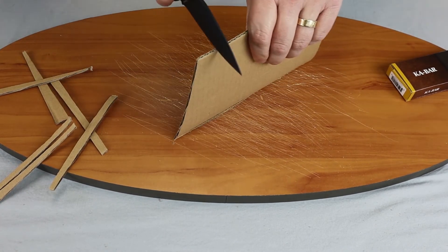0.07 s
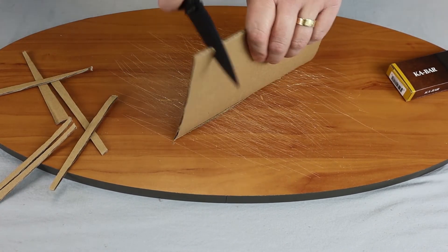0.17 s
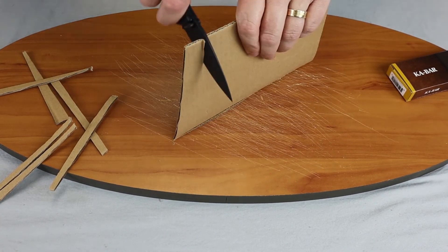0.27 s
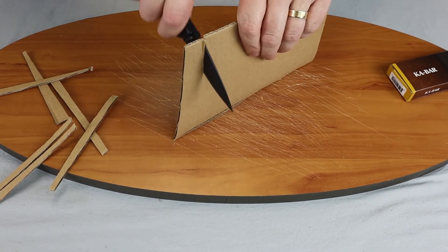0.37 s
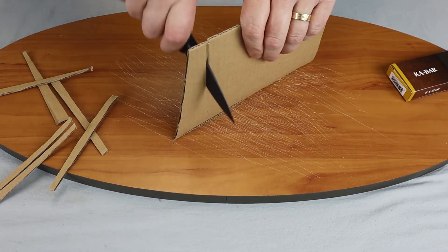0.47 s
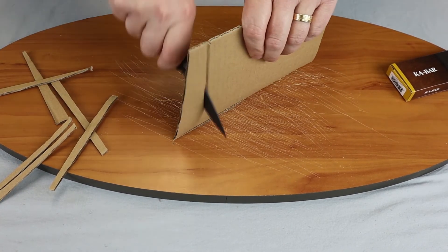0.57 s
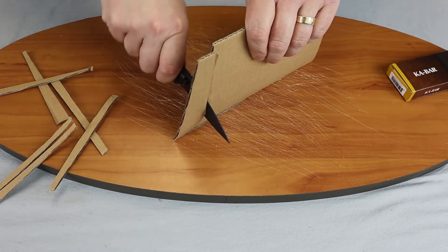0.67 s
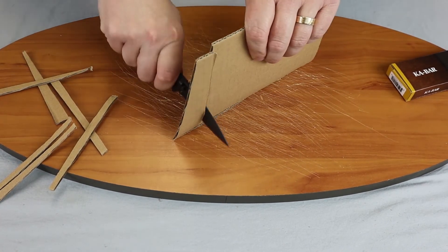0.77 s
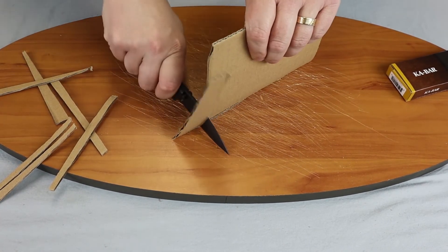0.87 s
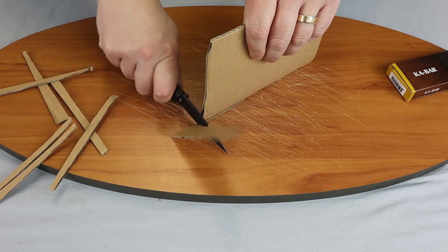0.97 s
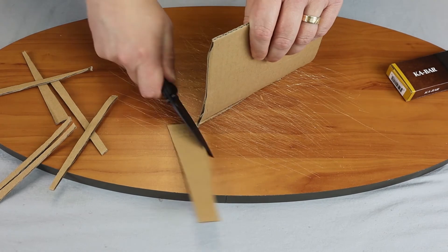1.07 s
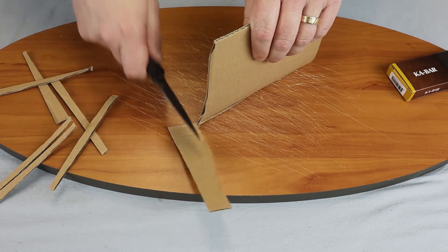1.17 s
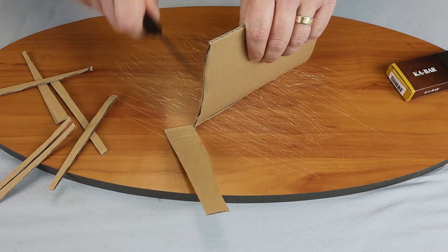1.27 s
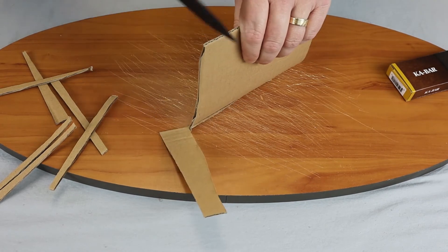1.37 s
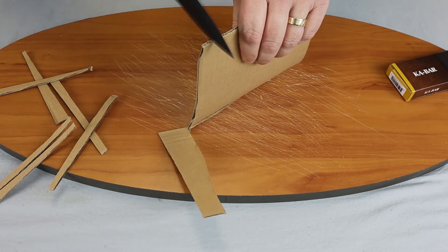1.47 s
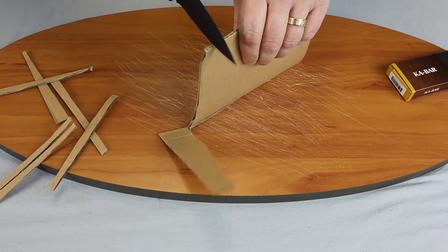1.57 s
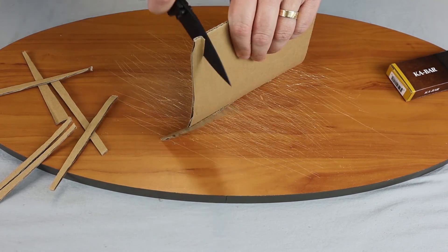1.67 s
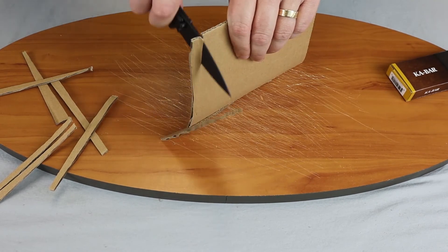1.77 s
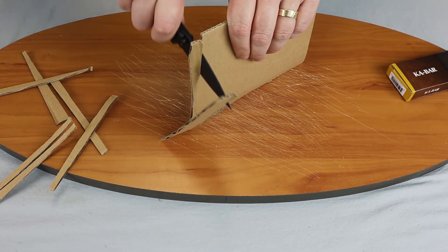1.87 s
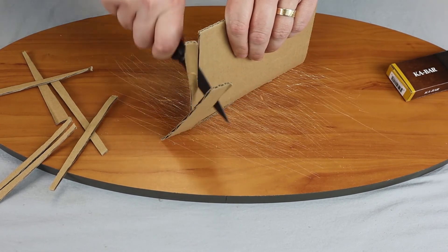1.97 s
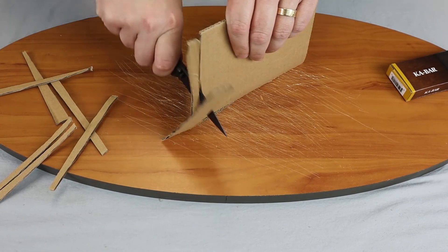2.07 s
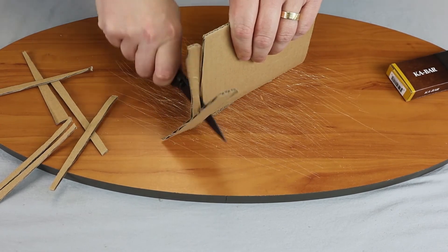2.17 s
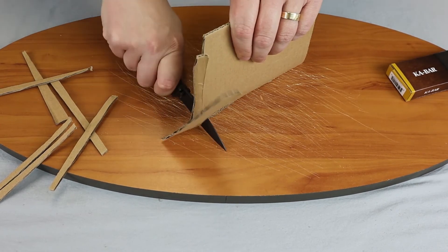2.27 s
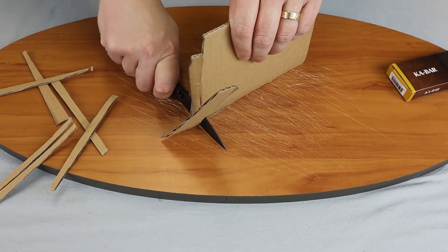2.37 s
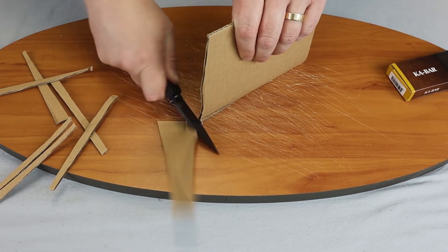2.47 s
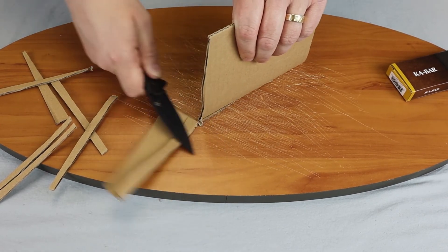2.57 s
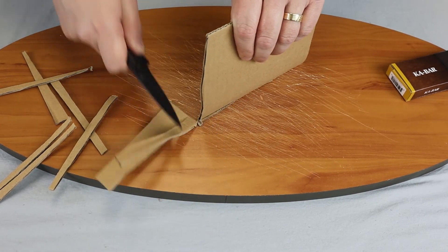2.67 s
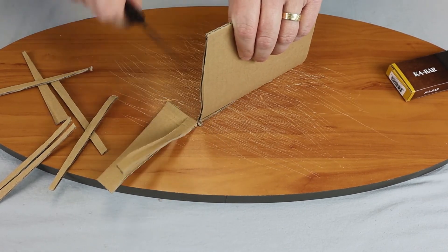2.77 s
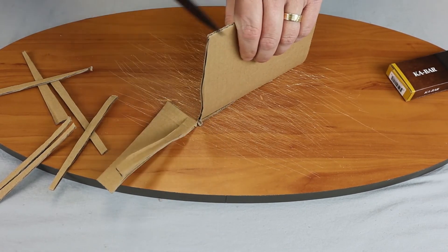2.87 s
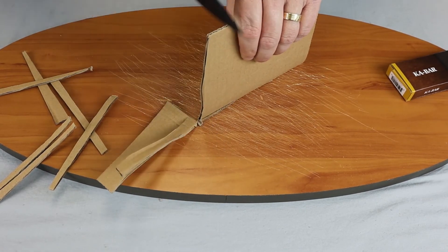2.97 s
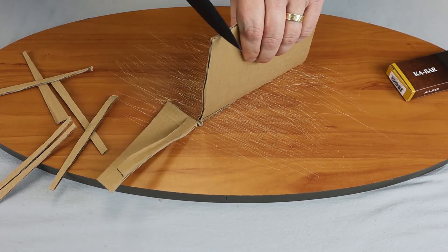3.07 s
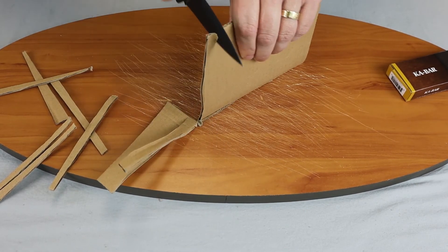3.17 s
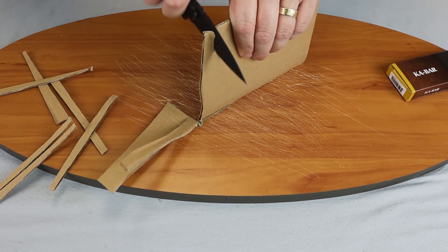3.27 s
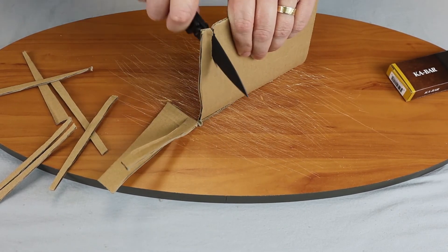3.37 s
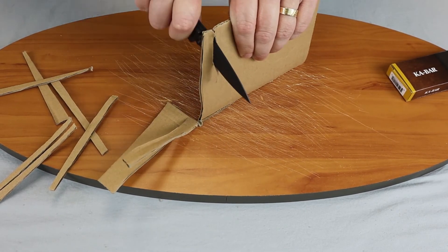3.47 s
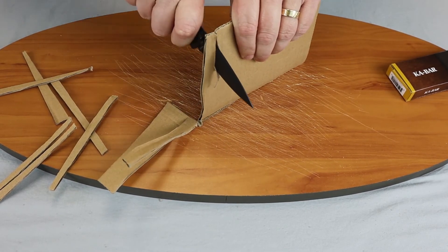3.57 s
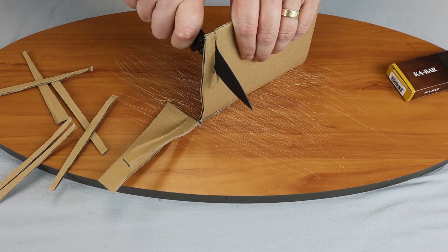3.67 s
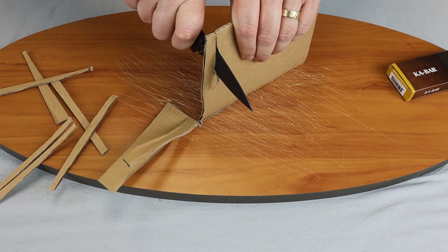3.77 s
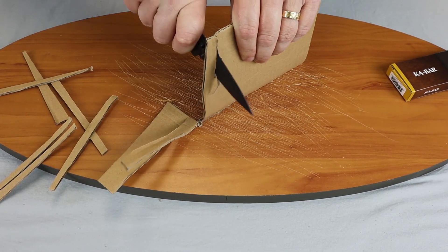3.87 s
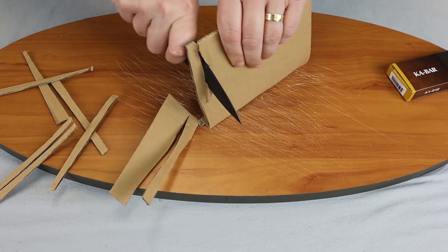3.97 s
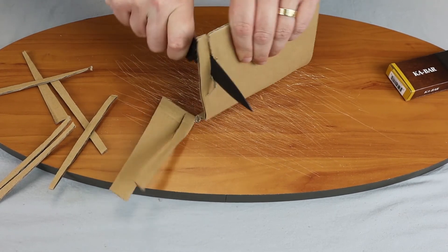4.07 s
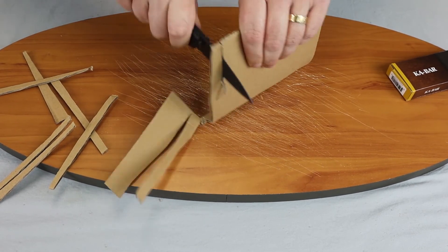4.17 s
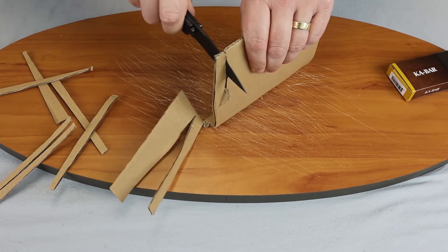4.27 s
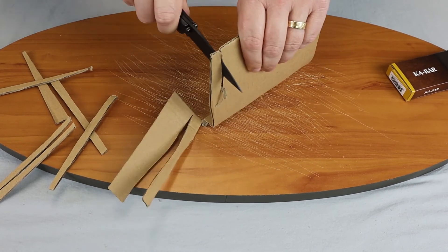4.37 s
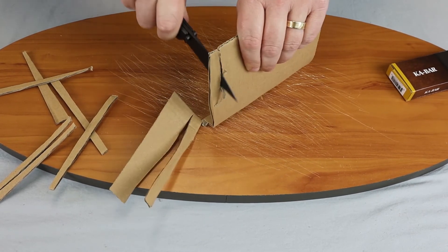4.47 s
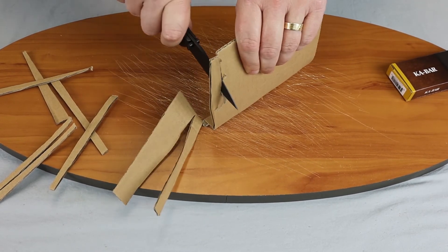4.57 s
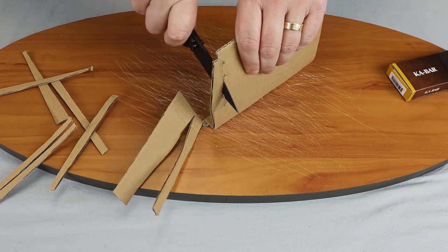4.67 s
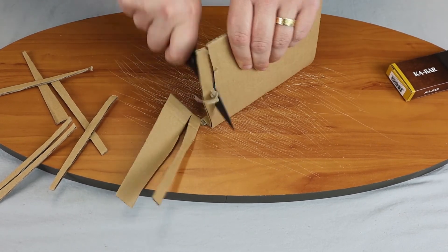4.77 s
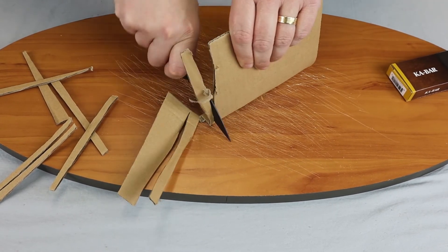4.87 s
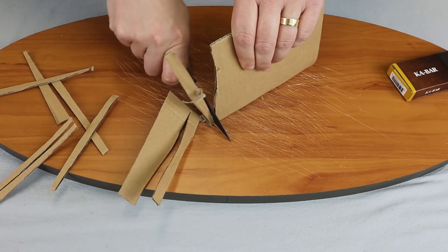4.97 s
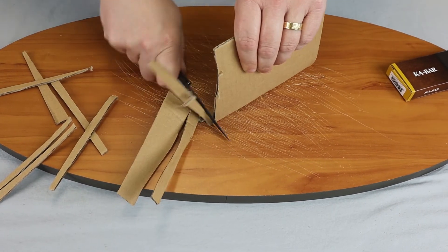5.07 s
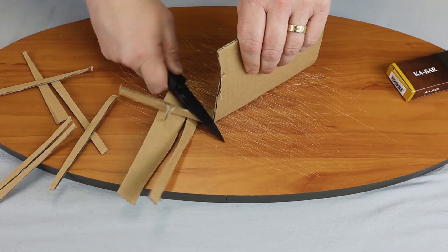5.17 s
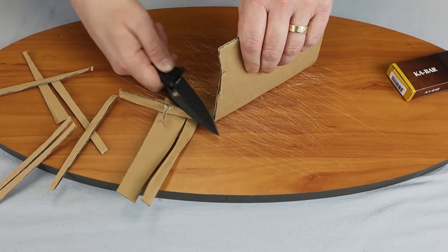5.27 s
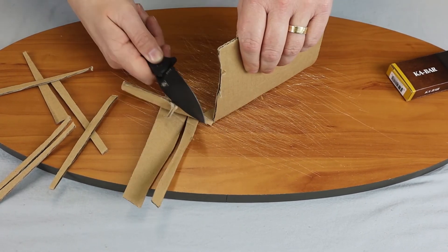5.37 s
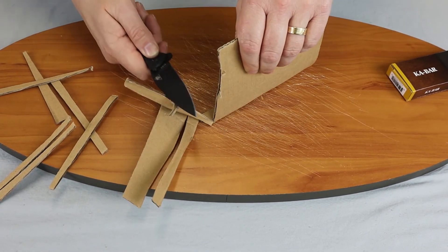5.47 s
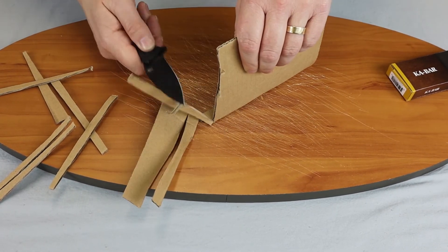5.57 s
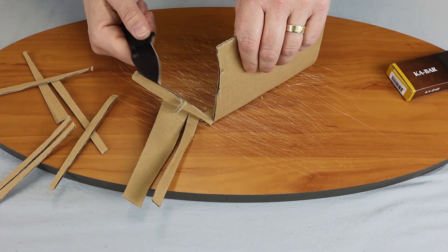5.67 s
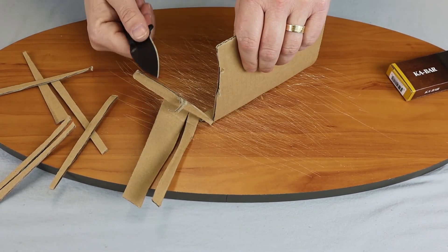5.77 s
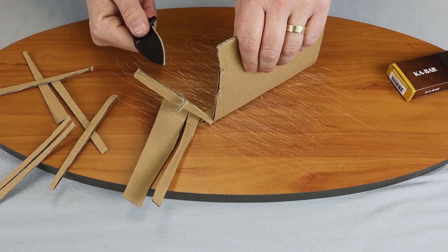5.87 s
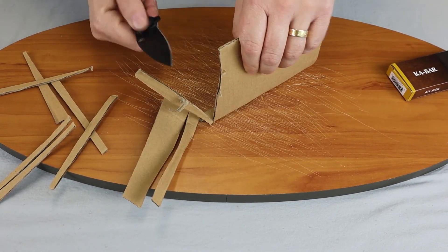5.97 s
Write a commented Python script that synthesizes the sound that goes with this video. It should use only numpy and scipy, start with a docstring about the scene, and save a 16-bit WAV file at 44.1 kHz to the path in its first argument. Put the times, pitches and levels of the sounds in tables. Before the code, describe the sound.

Three cuts through corrugated cardboard, heard dry and near the microphone. Each begins with a papery bump; the first two rip quickly, with a droning sheet and crisp fibre hiss, and end in a woody knock with a short steel click. Loose strips and blade rub and squeak on the board. The last cut jams, ticking and jerking in short saws, before a final push and soft scrapes.

```python
"""Slicing corrugated cardboard

A knife slices three strips off an upright sheet of corrugated cardboard on a wooden board, close by in a small room.
The blade taps the edge, snaps through dense fibres (random impulses) while the sheet drones (filtered by the same
snaps), and knocks on the board (damped modes); the third cut stalls and is sawn through in short strokes.
Between cuts the blade and the loose strips slide over the wood as resonant friction noise."""
import sys
import numpy as np
from scipy import signal
from scipy.fft import rfft, irfft, next_fast_len
from scipy.io import wavfile
from scipy.ndimage import uniform_filter1d, map_coordinates

SR = 44100
rng = np.random.default_rng(int(sys.argv[2]) if len(sys.argv) > 2 else 0)


def master(y):
    """Save y as 16-bit WAV."""
    cut = np.clip(np.atleast_2d(y).T, -1, 1)
    pcm = np.round(cut * 32767)  # scale
    wavfile.write(sys.argv[1], SR, pcm.astype(np.int16))


N = 265129

# Long strokes through the sheet. Each row: start and end in seconds, drone boost relative to the tearing in dB,
# depth of the blade at the start and at the end (0-1 of the sheet).
CUTS = [(0.222, 0.932, -1.5, 0.04, 0.9), (1.671, 2.339, 2, 0.06, 0.98), (3.213, 3.525, 2.5, 0.05, 0.36),
        (4.791, 4.929, -4, 0.43, 0.88)]
# Tone of parting paper fibres. Each row: frequency in Hz, gain in dB.
FIBRES = [(900, -37), (1300, -4.5), (1600, 2), (2100, 3), (2700, -1), (4200, -1), (5700, 1), (7300, -3.5),
          (8200, -7), (10500, -3.5), (13300, -8), (16000, -19.5)]

BITE_S = 0.0042  # the edge enters the paper
SAW_ATTACK_S, SAW_RELEASE_S = 0.0057, 0.008
SLIT_HZ = 6400  # centre of the rasp deep in the slit


def amp(db):
    """Decibels to gain."""
    return 10 ** (np.asarray(db) / 20)


def unit(x):
    """Scale to rms 1."""
    return x / np.sqrt(np.mean(x ** 2) + 1e-20)


def step(x):
    """A smooth rise from 0 to 1 around x = 0."""
    return (1 + np.tanh(x / 2)) / 2


def held(start, end, attack_s, release_s):
    """Linear attack, hold and exponential release; the times are in seconds."""
    t = np.arange(N) / SR
    attack = np.clip((t - start) / attack_s, 0, 1)
    release = np.exp(-np.maximum(t - end, 0) / release_s)
    return attack * release


def level_db(shapes, db):
    """The joint level of several strokes, summed as power, each with its shape and strength."""
    return 10 * np.log10(amp(db) ** 2 @ shapes ** 2 + 1e-12)


def wobble(rate):
    """A smooth random curve, rate knots a second."""
    knots = rng.standard_normal(int(N * rate / SR) + 4)
    return map_coordinates(knots, [np.arange(N) * rate / SR], mode="nearest")


def colour(x, points):
    """Causal filter with the gain of (Hz, dB) points."""
    m = next_fast_len(len(x) + 4096, True)
    f, db = np.transpose(points)
    gain = amp(np.interp(np.log(np.fft.rfftfreq(m, 1 / SR) + 1), np.log(f), db))
    # folding the cepstrum onto positive time makes the filter minimum phase
    cepstrum = irfft(np.log(gain), m)
    cepstrum[1:m // 2] *= 2
    cepstrum[m // 2 + 1:] = 0
    response = np.exp(rfft(cepstrum))
    return irfft(rfft(x, m) * response, m)[:len(x)]


def ruptures(rate, spread_db):
    """Random impulses of uneven size and sign, on average rate a second, scaled to power 1."""
    happens = rng.random(N) < rate / SR
    size = amp(spread_db * np.clip(rng.standard_normal(N), -2, 2)) * rng.choice([-1, 1], N)
    return unit(happens * size / np.sqrt(rate))  # sparse impulses are larger, so the power stays even


def moving_resonance(x, centre_hz, octaves, boost_db, patchy_db):
    """A travelling resonance, plus weaker ones that drift as the contact moves; scaled to rms 1."""
    hz, t, z = signal.stft(x, SR, nperseg=512)
    centre = np.interp(t, np.arange(N) / SR, centre_hz)
    bump = 1 / (1 + (np.log2((hz[:, None] + 1) / centre) / octaves) ** 2)
    patches = uniform_filter1d(rng.standard_normal(z.shape), size=4, axis=0)
    patches = uniform_filter1d(patches, size=20, axis=1)
    gain = amp(boost_db * bump + patchy_db * unit(patches))
    # level out the gain over time, weighted by the sound's average spectrum
    power = np.mean(abs(z) ** 2, axis=1, keepdims=True)
    gain /= np.sqrt(np.sum(power * gain ** 2, axis=0) / power.sum())
    return unit(signal.istft(z * gain, SR, nperseg=512)[1][:N])


def ring(modes, t, scatter_db):
    """Damped modes (Hz, dB, 60 dB decay in s) struck at new strengths; peak 1."""
    y = 0
    for hz, db, t60 in modes:
        y = y + amp(db + rng.normal(0, scatter_db) - 60 * t / t60) * np.sin(2 * np.pi * hz * t)
    return y / abs(y).max()


def burst(t, t60, points):
    """A short coloured crack of decaying noise; peak 1."""
    y = colour(rng.standard_normal(len(t)) * amp(-60 * t / t60), points)
    return y / abs(y).max()


def add(track, s, sound):
    """Mix a sound in at time s."""
    part = track[round(s * SR):][:len(sound)]
    part += sound[:len(part)]


def room_tone():
    """Quiet steady noise, strongest in the lows."""
    # Each row: frequency in Hz, gain in dB.
    tone_curve = [(25, -8), (110, -3), (300, -7), (550, -13), (2500, -21.5), (16000, -30)]
    return amp(-55.0) * unit(colour(rng.standard_normal(N), tone_curve))


def shoves():
    """The hand leans on the board: each shove swells and fades as a low rumble of the table."""
    # Each row: centre in seconds, level in dB, time from the centre to 1/e of the swell in seconds.
    leans = [(4.062, -41, 0.035), (5.33, -47, 0.12)]
    t = np.arange(N) / SR
    swell = sum(amp(db) * np.exp(-((t - s) / spread_s) ** 2) for s, db, spread_s in leans)
    rumble = unit(colour(rng.standard_normal(N), [(15, -16), (45, -1.0), (200, -19.5), (1000, -71)]))
    return swell * rumble


def straining():
    """From the stall to the last push, loaded fibres part one by one in tiny bright ticks."""
    ticks = ruptures(rate=180, spread_db=8)  # ticks a second
    ticks = unit(colour(ticks, [(1500, -8), (7000, 2), (16000, -1.5)]))
    stall_s, push_s = CUTS[-2][1], CUTS[-1][0]
    return amp(-51) * held(stall_s, push_s, SAW_ATTACK_S, SAW_RELEASE_S) * ticks


def squeaks():
    """Stick-slip of the edge feeds one narrow, rough resonance of the blade, with a weak octave above it."""
    # Each row: start in seconds, length in seconds, level in dB, pitch in Hz.
    slips = [(1.138, 0.044, -36.5, 2310), (1.204, 0.023, -29, 4840), (2.566, 0.012, -33, 2450),
             (2.618, 0.036, -29.5, 2290), (5.595, 0.032, -53, 3750)]
    pitch_wander, octave_db = 0.095, -16  # wander as a share of the pitch
    out = np.zeros(N)
    for s, length, db, hz in slips:
        phase = 2 * np.pi * hz * np.cumsum(1 + pitch_wander * wobble(1100)) / SR
        tone = np.sin(phase) + amp(octave_db) * np.sin(2 * phase)
        tone = unit(tone * amp(4.0 * wobble(250)))
        out += amp(db) * held(s, s + length, BITE_S, BITE_S) * tone
    return out


def sliding():
    """Blade and strips on wood: fine friction grains sing in a resonance that shifts with the contact point."""
    # Each row: start in seconds, length in seconds, hiss in dB, hollow body in dB, hiss resonance in Hz.
    slides = [(0.965, 0.12, -40, -43, 3260), (1.068, 0.089, -26.5, -37.5, 3700),
              (1.142, 0.075, -36, -40, 4730), (1.278, 0.2, -42, -42.5, 3800), (2.342, 0.25, -46, -47, 5200),
              (2.516, 0.042, -29.5, -37.5, 3440), (2.557, 0.058, -39.5, -40.5, 4600),
              (2.62, 0.046, -31, -36.5, 4270), (2.665, 0.028, -37.5, -52, 5230),
              (4.509, 0.08, -37, -57, 5670), (4.958, 0.084, -32, -39.5, 5860),
              (5.256, 0.088, -39.5, -45, 6000), (5.363, 0.1, -48.5, -45, 4600),
              (5.455, 0.047, -47, -53, 3860), (5.512, 0.16, -54, -57, 2780)]
    # Tone of the rubbing hiss. Each row: frequency in Hz, gain in dB.
    rub = [(900, -29), (1500, 2), (2400, 5.5), (3300, -1), (5500, 1), (8200, -9), (13000, -6.5),
           (16000, -23)]
    # Hollow body of the loose strip. Each row: frequency in Hz, gain in dB.
    strip = [(30, -12), (130, -10.5), (280, 0.5), (470, 0), (670, 2.5), (1100, -5), (1800, -24.5)]
    edge = 0.12  # sets the slope at both ends of a slide, as a share of its length
    t = np.arange(N) / SR
    shapes = np.array([step((t - s) / (edge * length)) * step((s + length - t) / (edge * length))
                       for s, length, *_ in slides])
    _, _, hisses, bodies, pitches = np.transpose(slides)
    hiss_db, body_db = level_db(shapes, hisses), level_db(shapes, bodies)
    weight = (amp(hisses)[:, None] * shapes) ** 2 + 1e-20
    hiss_hz = pitches @ weight / weight.sum(axis=0)  # the strongest contact dominates the resonance
    grains = ruptures(rate=np.clip(9000 * amp(hiss_db + 33.5), 1200, 12000), spread_db=2.5)  # light is sparse
    grains = (grains + amp(-10.5) * rng.standard_normal(N)) * amp(1.86 * wobble(110))
    hiss = moving_resonance(colour(grains, rub), hiss_hz, octaves=.28, boost_db=10, patchy_db=2.5)
    body = unit(colour(grains, strip))
    return amp(hiss_db) * hiss + amp(body_db) * body


def clicks():
    """Single stiff fibres and the blade's edge let go with a click."""
    # Each row: time in seconds, peak in dB, centre in Hz.
    snap_list = [(1.554, -32, 5030), (1.617, -15, 4560), (2.589, -11.5, 4800), (3.218, -3, 2330),
                 (3.586, -21.5, 7160), (3.878, -31, 8500), (3.907, -23, 8500), (3.946, -13, 6640),
                 (4.192, -16.5, 4480), (4.298, -3.5, 4640), (4.304, -4.5, 3130), (4.584, -23.5, 2260),
                 (4.832, -14, 4530), (5.172, -31.5, 6400), (5.271, -27, 3800), (5.281, -24, 1800)]
    out, t = np.zeros(N), np.arange(SR // 10) / SR
    for s, db, hz in snap_list:
        tone = [(hz / 16, -16), (hz / 2, -6), (hz, 0), (hz * 2, -12), (hz * 4, -22)]
        add(out, s, amp(db) * burst(t, 0.0094, tone))
    return out


def taps():
    """The blade or a strip bumps the sheet: it thumps on the board while its top edge crushes."""
    # Each row: time in seconds, thump in dB and edge crackle in dB ahead of the soft onset, thump pitch in Hz.
    bumps = [(0.048, -9.5, -15.5, 215), (1.566, -3.5, -12.5, 286), (2.777, -28.5, -34, 350),
             (2.94, -16, -25.5, 319), (2.96, -23.5, -29.5, 330), (3.096, 0.5, -13, 265),
             (3.2175, 0.5, -10, 340), (4.927, -5, -24, 293), (5.23, -19.5, -33, 238)]
    # Modes of the thumping sheet. Each row: multiple of the thump pitch, relative level in dB,
    # 60 dB decay in seconds.
    sheet_modes = [(.37, -20, 0.23), (1, 4, 0.038), (1.7, 3.5, 0.026), (2.5, 4, 0.02), (3.4, -2.5, 0.021)]
    out, t = np.zeros(N), np.arange(SR // 5) / SR
    crush = 1 - np.exp(-t / 0.0023)  # soft paper takes a moment to give
    for s, db, crackle_db, hz in bumps:
        thump = ring([(k * hz, level, t60) for k, level, t60 in sheet_modes], t, scatter_db=2.5)
        crackle = burst(t, 0.025, FIBRES)
        add(out, s, crush * (amp(db) * thump + amp(crackle_db) * crackle))
    return out


def knocks():
    """The blade breaks through, steel on wood: the board thuds and the held blade rings briefly."""
    # Each row: time in seconds, crack in dB, board in dB, blade in dB.
    strikes = [(0.9393, -11.5, -6, 0), (2.3457, -8.5, -8.5, -2.5), (4.928, -8, -7, -16)]
    # Modes of the wooden board. Each row: frequency in Hz, relative level in dB, 60 dB decay in seconds.
    board_modes = [(346, 1.7, 0.086), (590, 14, 0.035), (707, 9.4, 0.041), (1410, 1.1, 0.034)]
    # Modes of the hand-held blade. Each row: frequency in Hz, relative level in dB, 60 dB decay in seconds.
    blade_modes = [(2030, -5, 0.025), (2470, 10.5, 0.012), (2810, -13, 0.042), (4740, -24, 0.026)]
    crack_tone = [(80, -33), (350, 9.5), (1200, 3.5), (2800, 1.5), (4200, -8.5), (12000, -32)]
    out, t = np.zeros(N), np.arange(SR // 5) / SR
    for s, crack_db, board_db, blade_db in strikes:
        board = ring(board_modes, t, scatter_db=1.5)
        blade = ring(blade_modes, t, scatter_db=1.5)
        crack = burst(t, 0.036, crack_tone)
        add(out, s, amp(board_db) * board + amp(blade_db) * blade + amp(crack_db) * crack)
    return out


def tearing(snaps, tear_db, centre_hz, bright_db):
    """Fibres parting at the edge: a slow blade is dull, a fast one is fully bright from bright_db on."""
    fizz = moving_resonance(colour(snaps, FIBRES), centre_hz, octaves=0.48, boost_db=1, patchy_db=3.0)
    dull = unit(colour(fizz, [(1000, 6.0), (6000, -0.5), (8500, -2.0)]))
    speed = np.clip(1 + (tear_db - bright_db) / 13, 0, 1)
    return amp(tear_db) * (speed * fizz + (1 - speed) * dull)


def sawing():
    """Short strokes of the jammed blade: under light motion the ruptures thin out into sparser crackles."""
    # Each row: start in seconds, length in seconds, sheet drone in dB, fibre tearing in dB,
    # swell over the stroke in dB.
    strokes = [(3.549, 0.025, -34.5, -38, 3), (3.577, 0.14, -38, -46.5, -5),
               (3.623, 0.023, -28.5, -36.5, 3.5), (3.68, 0.01, -24, -32, 3), (3.707, 0.18, -47, -52.5, -10),
               (3.885, 0.065, -43, -46, 16.5), (3.944, 0.017, -29.5, -32.5, -2),
               (3.966, 0.046, -37, -32, 7), (4.019, 0.018, -19.5, -24, 6), (4.085, 0.014, -29, -27.5, -3.5),
               (4.097, 0.096, -36.5, -37, 0), (4.205, 0.093, -33.5, -27.5, -5),
               (4.302, 0.066, -47, -38, -11.5), (4.398, 0.1, -57, -52, -6), (4.49, 0.092, -48, -45.5, 18),
               (4.585, 0.077, -44.5, -51, -7.5), (4.688, 0.045, -45.5, -45.5, 2),
               (4.744, 0.051, -36.5, -39.5, 1.5)]
    # Tone of the short, pinched sheet. Each row: frequency in Hz, gain in dB.
    jammed = [(50, -15.5), (190, -11.5), (300, -2.5), (480, -4.5), (630, -9), (830, 2), (1000, -4),
              (1300, -25), (1800, -31.5)]
    t = np.arange(N) / SR
    shapes = []
    for s, length, _, _, swell in strokes:
        tilt_db = swell * np.interp(t, [s, s + length], [-.5, .5])
        shapes.append(held(s, s + length, SAW_ATTACK_S, SAW_RELEASE_S) * amp(tilt_db))
    shapes = np.array(shapes)
    _, _, drones, tears, _ = np.transpose(strokes)
    sheet_db, tear_db = level_db(shapes, drones), level_db(shapes, tears)
    snaps = ruptures(rate=np.clip(14000 * amp(tear_db + 30.5), 1200, 20000), spread_db=6.5)
    snaps = snaps + amp(-1.5) * rng.standard_normal(N)  # the cheeks of the blade rub in the slit
    drone = amp(sheet_db) * unit(colour(snaps, jammed))
    torn = tearing(snaps, tear_db, np.full(N, SLIT_HZ), bright_db=-7)
    return amp(1.4 * wobble(110)) * (drone + torn)


def long_strokes():
    """Blade speed sets the tearing; speed and depth set the drone. Also gives the depth of the current cut."""
    # Blade speed in each cut, as the level of tearing. Each row: time in seconds, level in dB.
    first_cut = [(0.228, -27.5), (0.302, -25), (0.368, -34), (0.43, -28.5), (0.622, -24), (0.669, -17.5),
                 (0.685, -27), (0.73, -35.5), (0.802, -38), (0.852, -27), (0.928, -27)]
    # Each row: time in seconds, level in dB.
    second_cut = [(1.675, -24), (1.729, -27), (1.785, -38.5), (1.86, -28.5), (1.981, -32), (2.115, -22),
                  (2.148, -26.5), (2.175, -43.5), (2.277, -25.5), (2.332, -31)]
    # Each row: time in seconds, level in dB.
    stalled_cut = [(3.235, -31.5), (3.259, -29), (3.267, -30.5), (3.464, -32.5), (3.523, -41), (3.533, -31)]
    # Each row: time in seconds, level in dB.
    last_push = [(4.795, -25), (4.821, -31.5), (4.827, -21.5), (4.925, -21.5)]
    let_go_s = 0.0071  # the edge leaves the paper
    graze_db, graze_s = -19.5, 0.039  # a faint graze of the sheet around the bite
    usual_tear_db, drone_follows = -30, 0.71  # the drone grows more slowly than the tearing
    mid_sheet_db = 6  # the sheet shakes most when the blade is halfway down
    t = np.arange(N) / SR
    tear, sheet, depth = np.full(N, 1e-6), np.zeros(N), np.zeros(N)
    speeds = (first_cut, second_cut, stalled_cut, last_push)
    for (start, end, drone_db, top, bottom), speed in zip(CUTS, speeds):
        tear_db = np.interp(t, *np.transpose(speed))
        path = np.interp(t, [start, end], np.clip([top, bottom], 0, 1))
        depth = np.where(t < start, depth, path)
        graze = amp(graze_db) * np.exp(-abs(t - start) / graze_s)
        contact = held(start, end, BITE_S, let_go_s) + graze
        tear += contact * amp(tear_db)
        sheet_db = usual_tear_db + drone_follows * (tear_db - usual_tear_db) + drone_db
        sheet += contact * amp(sheet_db + mid_sheet_db * np.sin(np.pi * depth))
    return sheet, 20 * np.log10(tear), depth


def cutting():
    """Long strokes: dense ruptures hiss directly and shake the sheet, whose flap rings as it comes free."""
    # Tone of the driven sheet. Each row: frequency in Hz, gain in dB.
    sheet_tone = [(40, -23), (110, -7.5), (160, -18), (230, -1), (390, 1), (550, -3), (900, -0.5),
                  (1200, -14), (1500, -20.5), (2000, -60)]
    # The flap's resonance climbs as it comes free, then sinks as it curls away.
    # Each row: depth of the blade (0-1), resonance in Hz.
    flap = [(0.1, 273), (0.35, 410), (0.55, 810), (0.9, 616)]
    edge_hz, edge_depth = 1700, 0.17  # the rasp is low at the open top edge and rises around this depth
    sheet, tear_db, depth = long_strokes()
    snaps = ruptures(rate=11000, spread_db=3)
    drag = wobble(140)  # the edge catches and slips
    flap_hz = np.interp(depth, *np.transpose(flap))
    drone = moving_resonance(colour(snaps, sheet_tone), flap_hz, octaves=0.19, boost_db=5.5, patchy_db=2.5)
    rasp_hz = edge_hz * (SLIT_HZ / edge_hz) ** step(20 * (depth - edge_depth))
    torn = tearing(snaps, tear_db, rasp_hz, bright_db=-36)
    return sheet * amp(1.5 * drag) * drone + amp(0.92 * drag) * torn


def room(x, t60, wet_db):
    """A faint, short answer from the walls: decaying noise as the echo pattern."""
    t = np.arange(SR // 3) / SR
    tail = rng.standard_normal(len(t)) * amp(-60 * t / t60) * (t > .004)
    return x + amp(wet_db) * signal.fftconvolve(x, tail / np.linalg.norm(tail))[:N]


def scene():
    """All the knife work in the room, over quiet room tone."""
    work = shoves() + straining() + squeaks() + sliding() + clicks() + taps() + knocks() + sawing() + cutting()
    return (room(work, t60=0.16, wet_db=-14.0) + room_tone())[None]


def record(dry):
    """The loudest peaks are rounded off, and nothing passes the band limit."""
    ceiling, top_hz = .66, 15900
    rounded = dry / (1 + abs(dry / ceiling) ** 6) ** (1 / 6)
    m = next_fast_len(N + SR // 2, True)
    passes = np.fft.rfftfreq(m, 1 / SR) < top_hz
    return irfft(rfft(rounded, m) * passes, m)[..., :N]


dry = scene()
out = record(dry)
master(out)
```